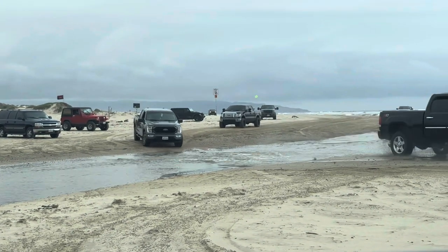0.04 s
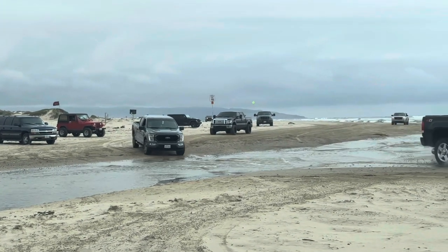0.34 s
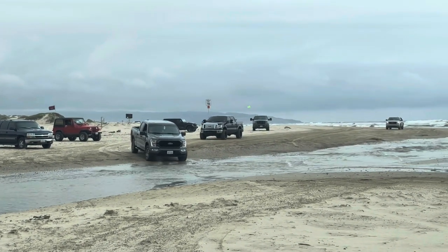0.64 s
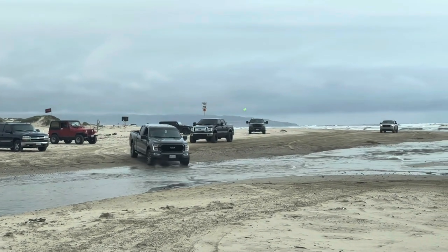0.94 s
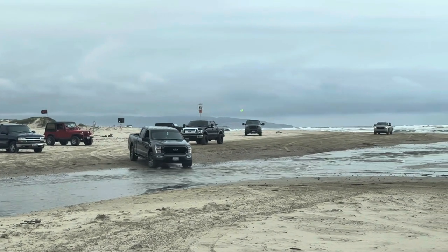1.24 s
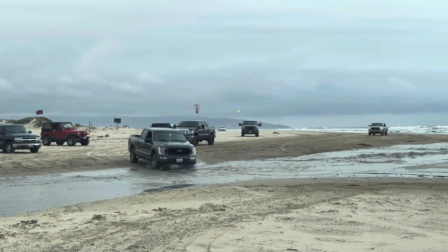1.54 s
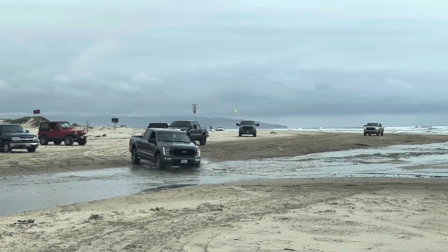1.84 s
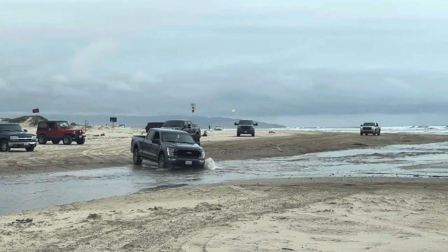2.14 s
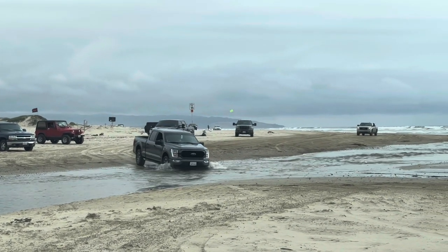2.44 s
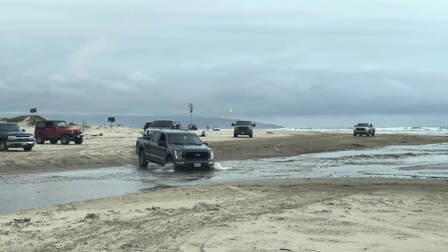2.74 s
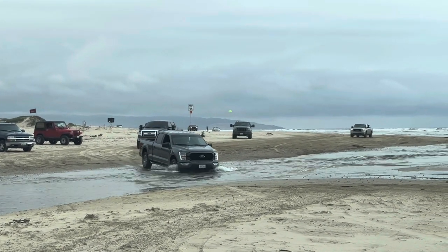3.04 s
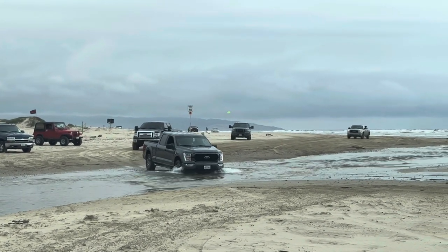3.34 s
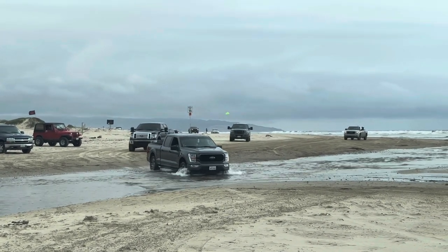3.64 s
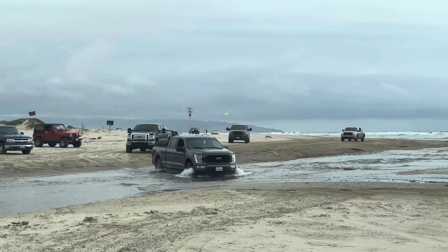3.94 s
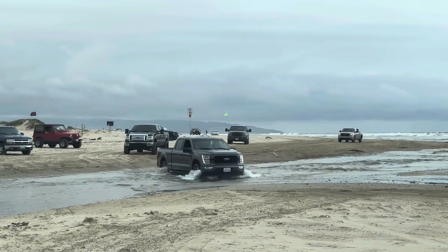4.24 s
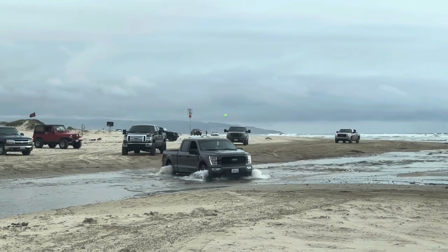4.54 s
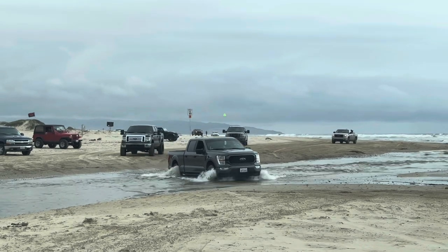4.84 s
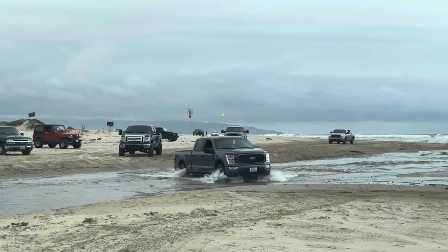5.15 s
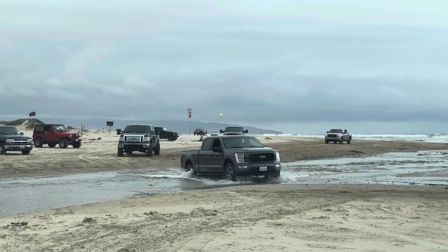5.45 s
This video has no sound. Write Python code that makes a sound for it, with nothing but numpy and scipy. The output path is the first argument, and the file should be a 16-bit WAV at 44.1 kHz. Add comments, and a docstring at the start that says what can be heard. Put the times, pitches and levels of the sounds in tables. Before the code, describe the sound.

On an open beach, the deep, uneven idle of a nearby pickup runs over a steady wash of surf. One truck pulls away with a short growl, then another drops in pitch as it enters a creek, its wheels softly sloshing and fizzing. Something brushes lightly on the microphone, a few low thumps swell, and faint brake-like squeaks sound far off before the wading engine rises slightly.

```python
"""A V8 pickup growls away from a shallow creek on a beach; a second slows and wades in, belts whining,
while a third idles close to the microphone with a lumpy throb. Each engine is firing tones over exhaust
puffs ringing in a pipe. Low thumps swell up, surf hisses behind, and wheels slosh and fizz in the water.
Something rubs softly on the hand-held camera, and a few thin squeaks come from afar."""
import sys
import numpy as np
from scipy import signal
from scipy.fft import rfft, irfft, next_fast_len
from scipy.io import wavfile
from scipy.ndimage import uniform_filter1d, map_coordinates

SR = 44100
rng = np.random.default_rng(int(sys.argv[2]) if len(sys.argv) > 2 else 0)


def dump_mix(stems):
    """Bounce the given channels to the path in sys.argv[1] as a 16-bit WAV at rate SR."""
    frames = np.atleast_2d(stems).T  # one column per channel
    limited = np.clip(frames, -1, 1)  # hard clip at full scale
    pcm = np.round(limited * 32767).astype(np.int16)
    wavfile.write(sys.argv[1], SR, pcm)


N = 246959

IDLE_FIRING_HZ = 51.8
# the bank each cylinder of a V8 fires into, in firing order: (side [+1 or -1])
V8_BANKS = [1, -1, 1, 1, -1, 1, -1, -1]


def amp(db):
    """Decibels to gain."""
    return 10 ** (np.asarray(db) / 20)


def unit(x):
    """Scale to rms 1."""
    return x / np.sqrt(np.mean(x ** 2) + 1e-20)


def along(points, hz):
    """Interpolate (frequency [Hz], value) points on a log frequency axis."""
    f, v = np.transpose(points)
    return np.interp(np.log(hz + 1), np.log(f + 1), v)


def curves(rows):
    """One value per sample for each column after the time."""
    times, *columns = np.transpose(rows)
    return [np.interp(np.arange(N) / SR, times, column) for column in columns]


def wobble(rate):
    """A smooth random curve, rate knots a second."""
    return map_coordinates(rng.standard_normal(4000), [np.arange(N) * rate / SR], mode="wrap")


def swell(start, length):
    """A half-sine rise and fall, silent outside its span."""
    return np.abs(np.sin(np.pi * np.clip((np.arange(N) / SR - start) / length, 0, 1)))


def filtered(x, response):
    """Multiply the spectrum of x by a function of frequency."""
    size = next_fast_len(N + SR // 2)
    return irfft(rfft(x, size) * response(np.fft.rfftfreq(size, 1 / SR)), size)[..., :N]


def ring(x, spectrum):
    """Send x through a causal, minimum-phase body with this spectrum."""
    size = SR // 2 * 2
    cepstrum = irfft(np.log(amp(along(spectrum, np.fft.rfftfreq(size, 1 / SR)))))
    cepstrum[1:size // 2] *= 2
    cepstrum[size // 2 + 1:] = 0
    return signal.fftconvolve(x, irfft(np.exp(rfft(cepstrum))))[:N]


def rush(spectrum, patchy_db):
    """Stereo noise of rms 1, with patches of random gain in time and frequency."""
    # how wide the hiss sounds, wide lows and centred highs: (frequency [Hz], centring [0 wide, 1 centred])
    centring = [(100, 0.65), (250, 0.38), (600, 0.46), (1300, 0.52), (1600, 0.87), (2000, 1), (6500, 1),
                (7800, 1), (9000, 0.97), (11000, 0.8), (14000, 1)]
    frames = signal.stft(rng.standard_normal((2, N)), nperseg=1024)[2]
    patches = uniform_filter1d(rng.standard_normal(frames.shape[1:]), size=5, axis=0)
    patches = uniform_filter1d(patches, size=8, axis=1)
    pair = signal.istft(frames * amp(patchy_db * unit(patches)))[1][:, :N]

    def colour_and_width(hz):
        angle = np.arccos(np.clip(along(centring, hz), -1, 1)) / 2
        return amp(along(spectrum, hz)) * [np.cos(angle), np.sin(angle)]

    mid, side = filtered(pair, colour_and_width)
    return unit(np.array([mid + side, mid - side]))


def placed(x, left_db, lead_rad=0):
    """A mono source left of the microphone: louder and earlier in phase on that side."""
    side = np.array([[1], [-1]]) / 2
    return filtered(x, lambda hz: amp(left_db * side) * np.exp(1j * lead_rad * side))


def exhaust(firings, pipe, bank_db, scatter_db, jitter_s):
    """One puff per firing rings the pipe; cylinders of unequal strength make the burble."""
    at = np.flatnonzero(np.diff(np.floor(firings)))
    chance = rng.standard_normal((1000, 2))[:len(at)]
    sizes = amp(bank_db * np.resize(V8_BANKS, len(at)) + scatter_db * chance[:, 0])
    at = np.clip(at + jitter_s * SR * chance[:, 1], 0, N - 1).astype(int)
    return unit(ring(np.bincount(at, sizes, N), pipe))


def departing_truck():
    """A V8 drives off, sagging under load; unequal cylinders split its note into throbbing partials."""
    # the growl: (order [per engine cycle], opening level [dB], full-load level [dB], held until [s])
    partials = [(5, -45, -46, .25), (6, -42, -33, .33), (8, -32, -29, .34), (10, -33.5, -40, .45),
                (11, -38, -41, .45), (12, -46, -45, .27), (13, -47, -45.5, .27)]
    # resonance of the pipe: (frequency [Hz], relative gain [dB])
    pipe = [(40, -36), (80, -16), (105, -8), (135, -5), (175, 4.5), (215, -0.5), (245, -9), (290, -17),
            (360, -13.5), (500, -34), (800, -30), (1200, -48), (4000, -110)]
    start_hz, sag_hz_per_s, first_chug_s = 144.6, 32, 0.00706
    full_load_s, fade_db_per_s = 0.16, 69
    grit_db, grit_hold_s = -42, 0.27
    t = np.arange(N) / SR
    firing_hz = np.maximum(start_hz - sag_hz_per_s * t, IDLE_FIRING_HZ)
    firings = np.cumsum(firing_hz) / SR + 0.008 * wobble(25)
    cycles = (firings - start_hz * first_chug_s) / len(V8_BANKS)
    load = np.minimum(t / full_load_s, 1)
    fade = lambda held_s: amp(-fade_db_per_s * np.maximum(t - held_s, 0))
    tones = 0
    for order, open_db, full_db, held_s in partials:
        gain = amp(open_db + load * (full_db - open_db) + .7 * wobble(25)) * fade(held_s)
        tones += gain * np.cos(2 * np.pi * (round(order) * cycles + .06 * rng.standard_normal()))
    puffs = exhaust(firings, pipe, bank_db=2, scatter_db=1.5, jitter_s=0.00194)
    grit = amp(grit_db) * fade(grit_hold_s) * puffs / np.std(puffs[t < grit_hold_s])
    return placed(np.sqrt(2) * tones + grit, left_db=1.5, lead_rad=0.34)


def wading_truck():
    """A truck slows for the water, then picks up; its firing tones glide over the burble of its pipe."""
    # the engine note: (time [s], firing rate [Hz], fundamental [dB], octave [dB], third harmonic [dB])
    engine_note = [(0, 116, -58, -60, -70), (.64, 110, -52, -52, -70), (.74, 104, -33, -52, -70),
                   (.8, 100.5, -33, -53, -70), (.9, 92.7, -39, -46.5, -70), (1, 86.5, -39.5, -47, -70),
                   (1.2, 81.3, -42, -40.5, -70), (1.5, 72.9, -49, -49, -70), (1.7, 73.2, -39, -45.5, -70),
                   (2.06, 74, -37.5, -43.5, -70), (2.3, 73.6, -36, -44.5, -70),
                   (2.62, 72.3, -37.5, -43, -62), (2.85, 71, -45, -46.5, -65), (3.12, 69.6, -47, -50, -65),
                   (3.44, 68.1, -48, -43, -62), (4, 65.8, -51, -45.5, -62), (4.35, 65.8, -48, -44, -60),
                   (4.75, 68.5, -42, -47, -55), (5.3, 73, -45, -50, -54), (5.6, 74.5, -36, -53, -49)]
    # strength of the exhaust puffs: (time [s], level [dB])
    throttle = [(0, -51), (.35, -53.5), (.6, -41), (.8, -48.5), (1, -50), (1.6, -46), (2.4, -48.5),
                (3.2, -44), (3.7, -44), (4, -48), (4.6, -44), (5, -45.5), (5.6, -44)]
    # resonance of the tailpipe: (frequency [Hz], relative gain [dB])
    tailpipe = [(30, -37), (50, -3), (80, -2.5), (103, -3.5), (125, -10.5), (175, -2.5), (220, -5.5),
                (270, -15.5), (400, -29.5), (800, -48.5), (2000, -69), (6000, -120)]
    firing_hz, tone_db, octave_db, third_db = curves(engine_note)
    firings = np.cumsum(firing_hz) / SR + 0.021 * wobble(35)
    tones = amp(tone_db + 1.5 * wobble(12)) * np.sin(2 * np.pi * firings)
    tones += amp(octave_db + 1.5 * wobble(18)) * np.sin(4 * np.pi * firings)
    tones += amp(third_db) * np.sin(6 * np.pi * firings)
    puffs = exhaust(firings, tailpipe, bank_db=3, scatter_db=4.0, jitter_s=0.0015)
    return placed(np.sqrt(2) * tones + amp(curves(throttle)[0]) * puffs, left_db=2.5, lead_rad=0.32)


def engine_bay():
    """The wading truck's belts and pulleys give narrow, fuzzy whines that grow as it nears."""
    # the whines at close range: (pitch [Hz], level [dB])
    whines = [(1455, -79), (1787, -85), (2336, -84), (3085, -78.5), (3440, -89), (4054, -88)]
    # the bay turning towards the microphone: (time [s], gain [dB])
    nearness = [(0, -15), (2.5, -8), (3.8, -4), (4.2, 1), (5, -1), (5.5, 0)]
    width_hz = 45
    t = np.arange(N) / SR
    singing = 0
    for hz, db in whines:
        fuzz = wobble(width_hz) + 1j * wobble(width_hz)
        singing += amp(db) * unit(np.real(fuzz * np.exp(2j * np.pi * hz * t)))
    return amp(curves(nearness)[0]) * singing


def idling_truck():
    """A V8 parked close by fires four times a turn; its tones waver under lumpy, loping puffs."""
    # the drone: (order [per crank turn], level [dB])
    orders = [(2, -47.5), (7, -48), (8, -43.5), (14, -49.5), (22, -61)]
    # the firing tone: (time [s], level [dB])
    boom_level = [(0, -43), (.4, -43), (.8, -34.5), (1.1, -36), (1.3, -41), (1.8, -34.5), (2.6, -38.5),
                  (3.3, -38.5), (3.75, -35.5), (4.3, -33), (4.8, -37), (5.1, -43), (5.6, -32.5)]
    # the tone that uneven banks add at 1.5 times the firing rate: (time [s], level [dB])
    bank_level = [(0, -46), (1, -51), (1.9, -47), (2.3, -41), (2.8, -55), (3.35, -37.5), (3.8, -49),
                  (4.3, -53), (4.7, -42.5), (5.6, -44.5)]
    # strength of the exhaust puffs: (time [s], level [dB])
    puff_level = [(0, -39.5), (.55, -38.5), (1, -40.5), (1.7, -42), (2.3, -40), (3, -41), (3.5, -39),
                  (4.1, -44.5), (4.8, -40), (5.6, -41)]
    # resonance of the muffler: (frequency [Hz], relative gain [dB])
    muffler = [(25, -22.5), (38, 9), (50, -9), (66, 6), (80, 3), (100, 1), (122, -4), (175, -7),
               (230, -12.5), (300, -20), (450, -26.5), (900, -47.5), (2000, -71), (6000, -120)]
    throb_period_s, throb_peak_s, throb_depth_db = .315, 0.53, 2
    firings = np.cumsum(IDLE_FIRING_HZ * (1 + 0.0041 * wobble(2.5))) / SR
    crank = firings / 4
    drone = 0
    for order, db in orders:
        gain = amp(db + 1.7 * wobble(7.4))
        drone += gain * np.sin(2 * np.pi * (round(order) * crank + rng.random() + .04 * wobble(8)))
    throb_db = throb_depth_db * np.cos(2 * np.pi * (np.arange(N) / SR - throb_peak_s) / throb_period_s)
    boom = amp(curves(boom_level)[0] + throb_db + 1.9 * wobble(10)) * np.sin(2 * np.pi * firings)
    bank_gain = amp(curves(bank_level)[0] + 2.5 * wobble(12))
    bank_tone = bank_gain * np.sin(2 * np.pi * (1.5 * firings + .06 * wobble(8)))
    lope_db = np.sin(np.pi * crank)  # once every two turns
    puffs = exhaust(firings, muffler, bank_db=1.5, scatter_db=2.0, jitter_s=0.00285)
    return drone + boom + bank_tone + placed(amp(curves(puff_level)[0] + lope_db) * puffs, left_db=3.0)


def beach():
    """Behind the trucks lies a wide wash of surf and far engines, with fine spray on top."""
    # surf and distant traffic: (frequency [Hz], relative density [dB])
    surf_spectrum = [(25, -20), (60, 9.5), (200, 9), (330, 5.5), (480, 1), (700, -1.24), (850, -7),
                     (1100, -8), (1500, -12), (2500, -13.5), (3500, -18.5), (5000, -26.5), (10000, -30),
                     (15000, -56)]
    # course of the wash: (time [s], level before the lift [dB])
    surf_level = [(0, -52.5), (.4, -53.5), (1, -53.5), (2, -54.5), (3, -54.5), (4, -54.5), (5, -54),
                  (5.6, -53.5)]
    # fine spray: (frequency [Hz], relative density [dB])
    spray_spectrum = [(2000, -1.5), (4800, -10.5), (6200, -2), (7500, -2), (10000, -1), (11500, -15.5),
                      (15500, -9.5)]
    # course of the spray: (time [s], level [dB])
    spray_level = [(0, -63), (.4, -68), (.55, -66), (2, -73.5), (3.5, -71.5), (4.8, -69.5), (5.6, -70.5)]
    # ripples in the wash's tone colour, narrow peaks and hollows: (centre [Hz], width [Hz], gain [dB])
    ripples = [(492, 28, -2.5), (677, 30, 2.5), (834, 38, 6), (1200, 40, -2), (1290, 37, 2.5),
               (1480, 95, 4.5), (1697, 58, -1.5), (1830, 64, 4), (2070, 65, -2.5), (2255, 98, 3)]
    lift_db = 5.0
    surf = amp(curves(surf_level)[0] + lift_db + 0.27 * wobble(9.8)) * rush(surf_spectrum, patchy_db=1.5)
    spray = amp(curves(spray_level)[0] + 0.57 * wobble(11)) * rush(spray_spectrum, patchy_db=1.2)
    ripple_db = lambda hz: sum(db * np.exp(-((hz - centre) / width) ** 2) for centre, width, db in ripples)
    lean_db = lambda hz: along([(600, 2.0), (1100, 0.33)], hz) / 2  # the lows sit a little to the left
    return filtered(surf, lambda hz: amp(ripple_db(hz) + [lean_db(hz), -lean_db(hz)])) + spray


def bow_wave():
    """Water pushed aside by the wheels breaks with a smooth fizz."""
    # breaking water: (frequency [Hz], relative density [dB])
    fizz_spectrum = [(700, -21.5), (1600, -0.5), (2700, -3.5), (3700, 0.5), (5000, -11.5), (8000, -28)]
    # rise and fall of the wave: (time [s], level [dB])
    fizz_level = [(0, -68.5), (1.5, -86), (2.6, -75), (3.6, -70.5), (4.6, -76), (5.6, -72)]
    return amp(curves(fizz_level)[0]) * rush(fizz_spectrum, patchy_db=0.5)


def slosh(count=1800, pitch_hz=1900, spread=0.405, cycles=9, size_db=3):
    """Tyres churn the creek into drops and short bubbles that start softly and rise in pitch."""
    # water thrown by the tyres: (time [s], level [dB])
    water_level = [(0, -75), (.5, -79), (1, -69), (2, -82), (3, -69.5), (4.5, -88), (5.6, -73)]
    t = np.arange(SR // 50) / SR
    start = rng.integers(0, N, (count, 1))
    hz = np.clip(pitch_hz * np.exp(spread * rng.standard_normal((count, 1))), 500, 4000)
    age = hz * t / cycles
    strength = amp(size_db * np.minimum(rng.exponential(size=(count, 1)), 4))
    size = strength * pitch_hz / hz  # big bubbles are low and loud
    envelope = (1 - np.exp(-(hz * t) ** 2)) * np.exp(-2 * age) * (1 - t / t[-1])
    drops = size * envelope * np.sin(2 * np.pi * hz * t * (1 + 0.046 * age))
    water = np.bincount((start + np.arange(len(t))).ravel(), drops.ravel(), N)[:N]
    return amp(curves(water_level)[0]) * unit(water)


def handling():
    """Right at the microphone, touches and uneven strokes swish on the case; firm ones whistle a little."""
    # touches and strokes: (start [s], length [s], level [dB], whistle over the swish [dB])
    strokes = [(0.078, 0.41, -68, -19), (.45, 2.6, -74.5, -24), (0.554, .011, -57, 3),
               (0.562, 0.05, -58.5, -20), (0.654, 0.28, -57.5, -19), (0.92, 0.19, -55, -2.5),
               (.945, .055, -67.5, 4), (1.171, .26, -58, -21), (1.234, 0.055, -68, 4),
               (1.493, 0.35, -67, -24), (1.83, 0.17, -69, -20), (2.15, 0.18, -71.5, -18),
               (3.07, .12, -73, -20), (3.24, 0.17, -68, -16)]
    # swish of the camera's case: (frequency [Hz], relative density [dB])
    swish_spectrum = [(2500, -14), (4300, -8), (6300, -4), (8000, -0.5), (10000, 0), (11500, -7),
                      (15500, -3.5)]
    # what a firm stroke excites: (frequency [Hz], relative density [dB])
    whistle_spectrum = [(4000, -32), (5400, -9.5), (6100, 0.5), (6700, -4.5), (7200, -6), (8500, -21.5)]
    swish_power, whistle_power = 1.27, 7.8  # the whistle sounds only at the height of a stroke
    swish = whistle = 0
    for start, length, db, whistle_db in strokes:
        stroke = swell(start, length)
        swish += amp(db) * stroke ** swish_power
        whistle += amp(db + whistle_db) * stroke ** whistle_power
    flicker = amp(1.2 * wobble(35.2))
    swish = swish * rush(swish_spectrum, patchy_db=1.2)
    whistle = whistle * rush(whistle_spectrum, patchy_db=2.0)
    return flicker * (swish + whistle)


def thumps(length_s=.13):
    """Soft, low thumps, a few cycles long, swell out of the rumble a little to the left."""
    # each thump: (time of peak [s], pitch [Hz], peak level [dB])
    peaks = [(.48, 77.5, -31), (1.285, 71.2, -28.5), (1.68, 76.4, -31.5), (1.8, 75.4, -28.5),
             (3.45, 71.5, -34), (5.24, 88.3, -32.5)]
    t = np.arange(N) / SR
    booms = 0
    for peak_s, hz, db in peaks:
        envelope = swell(peak_s - length_s / 2, length_s) ** 2
        booms += amp(db) * envelope * np.sin(2 * np.pi * (hz * t + rng.random()))
    return placed(booms, left_db=3.0)


def squeaks():
    """Thin, raspy squeaks from far off, as of wet brakes."""
    # each squeak: (start [s], length [s], pitch [Hz], level [dB])
    notes = [(2.935, 0.11, 6320, -66), (3.02, 0.076, 6318, -71), (3.278, 0.052, 5350, -72),
             (3.527, .036, 5680, -69), (3.567, .036, 5670, -69), (3.625, 0.1, 6300, -66),
             (3.713, .1, 6285, -70)]
    wavering_time = np.cumsum(1 + .006 * wobble(300)) / SR
    rasp = amp(2.5 * wobble(120))
    return rasp * sum(amp(db) * swell(start, length) ** 2 * np.sin(2 * np.pi * hz * wavering_time)
                      for start, length, hz, db in notes)


def scene():
    """Three trucks at the creek, heard in the open air without echoes."""
    trucks = departing_truck() + wading_truck() + engine_bay() + idling_truck()
    return trucks + thumps() + beach() + bow_wave() + slosh() + handling() + squeaks()


def record(dry):
    """The camera's band-limited stereo microphone; its two ports differ in phase, fully so near 8 kHz."""
    # phase between the ports: (frequency [Hz], lead of the left [rad])
    port_lead = [(430, 0), (780, .5), (1030, 1.0), (1700, 0), (6700, 0), (7250, .8), (7800, 3.14),
                 (8750, 3.14), (9400, 1.2), (10200, .7), (10500, 0), (13000, 0), (13900, -1), (15300, -1.8)]
    fade_in_s, top_hz = .004, 15750
    fade_in = np.minimum(np.arange(N) / (fade_in_s * SR), 1)
    ports = lambda hz: np.exp(.5j * along(port_lead, hz) * [[1], [-1]]) * (hz < top_hz)
    return filtered(fade_in * dry, ports)


dry = scene()
out = record(dry)
dump_mix(out)
```